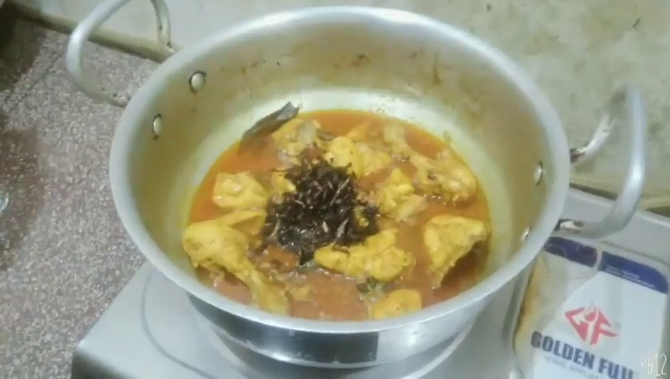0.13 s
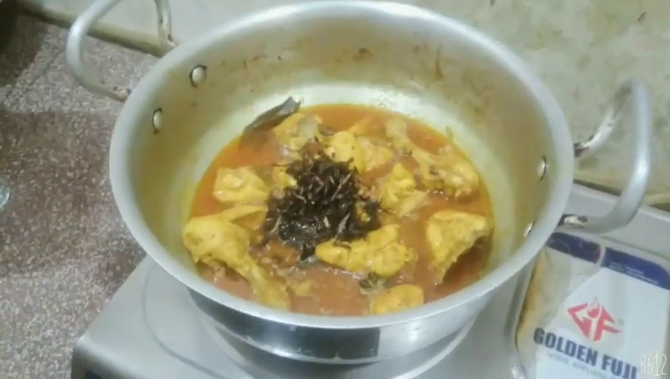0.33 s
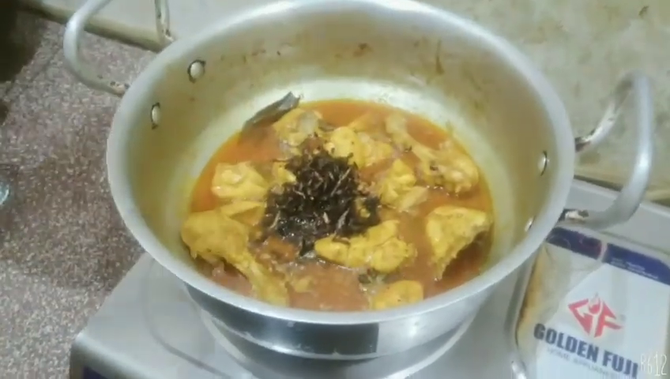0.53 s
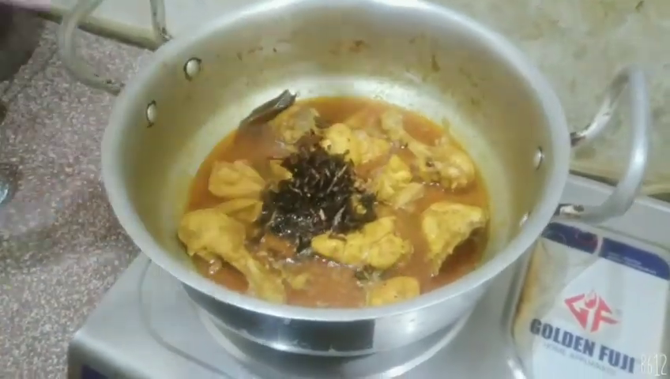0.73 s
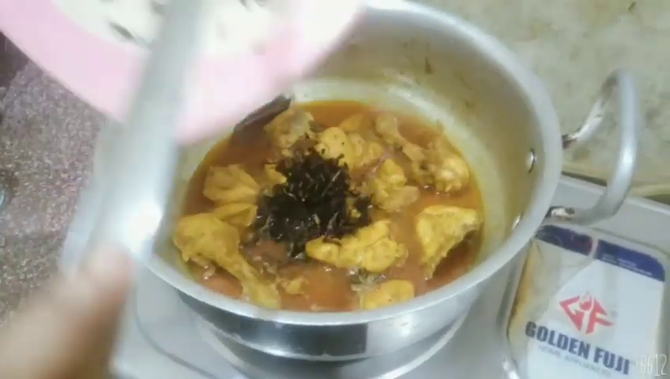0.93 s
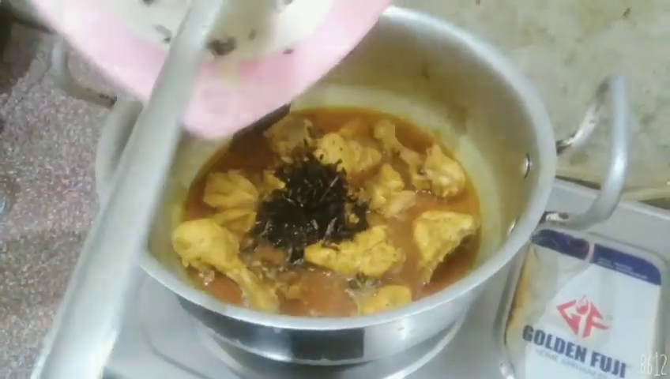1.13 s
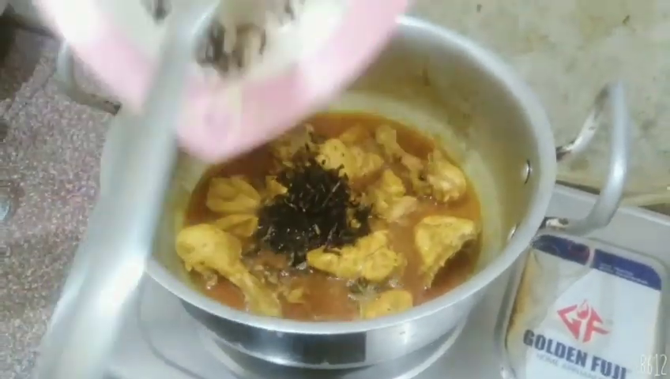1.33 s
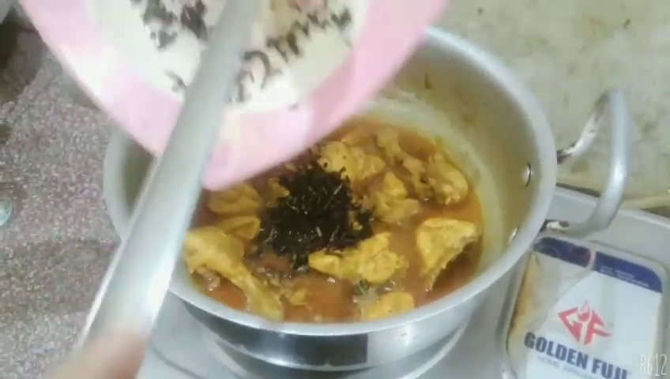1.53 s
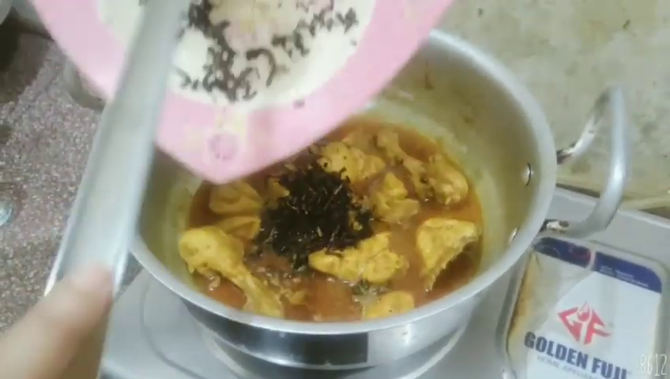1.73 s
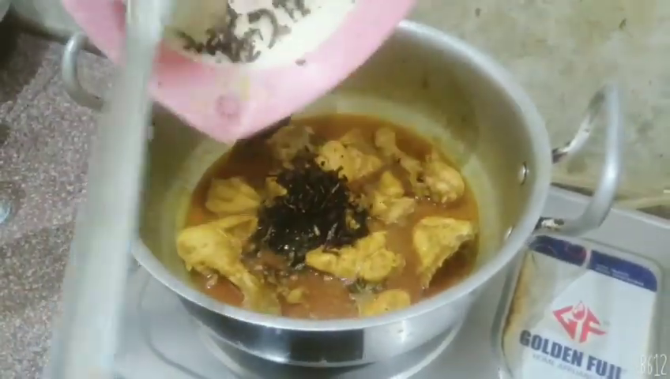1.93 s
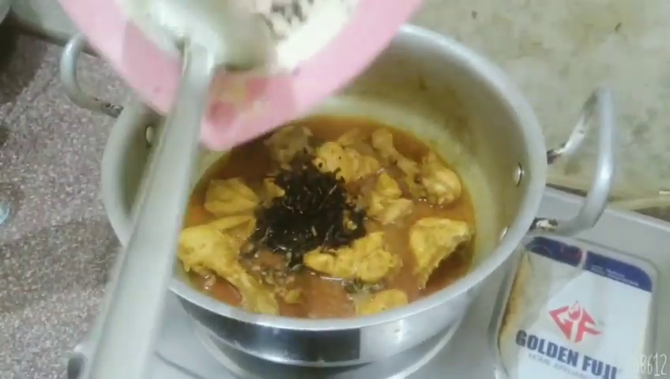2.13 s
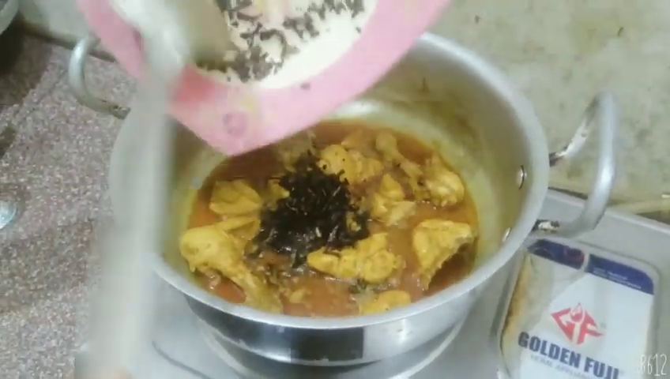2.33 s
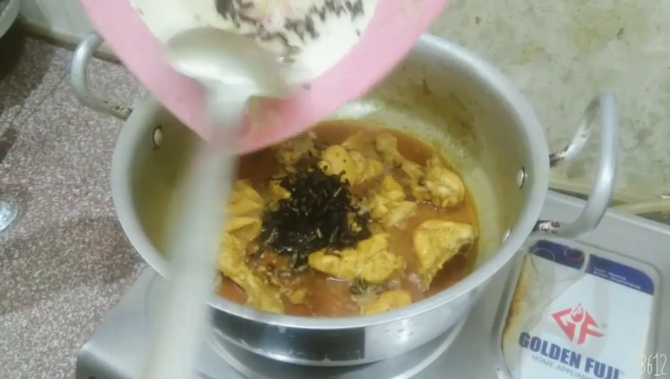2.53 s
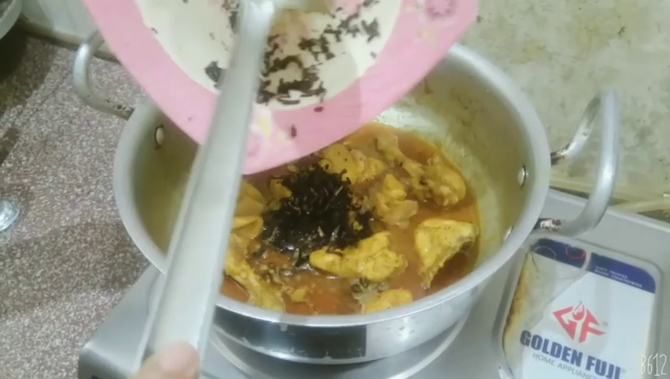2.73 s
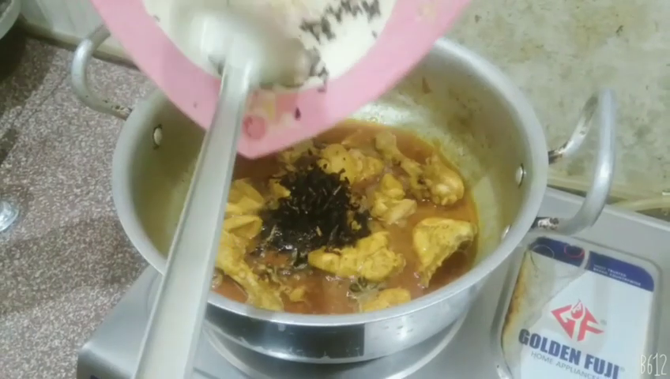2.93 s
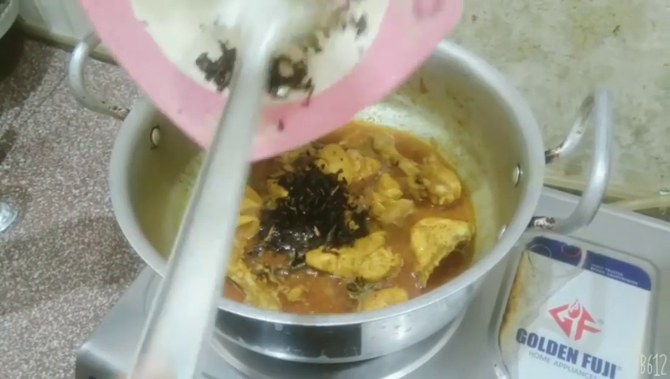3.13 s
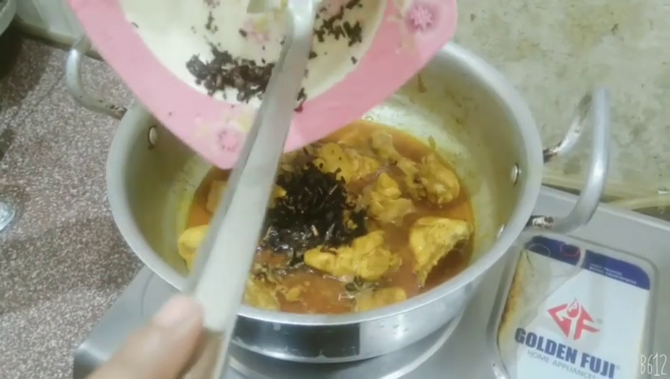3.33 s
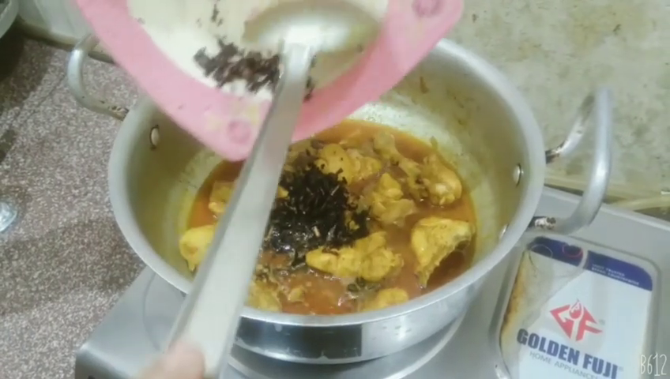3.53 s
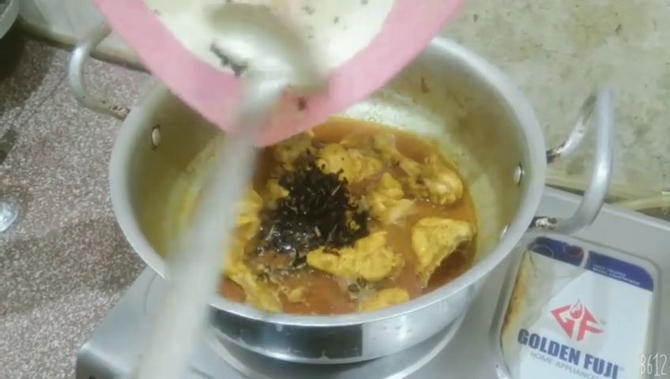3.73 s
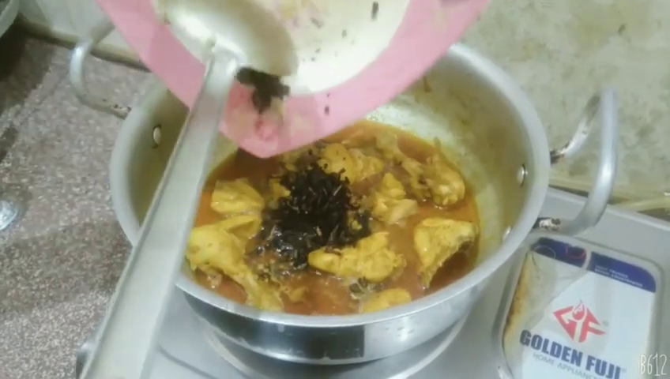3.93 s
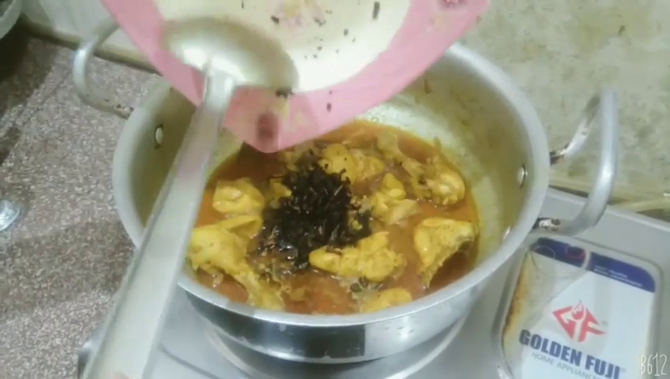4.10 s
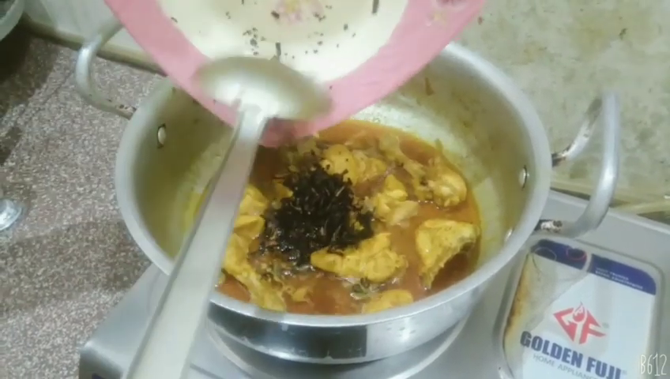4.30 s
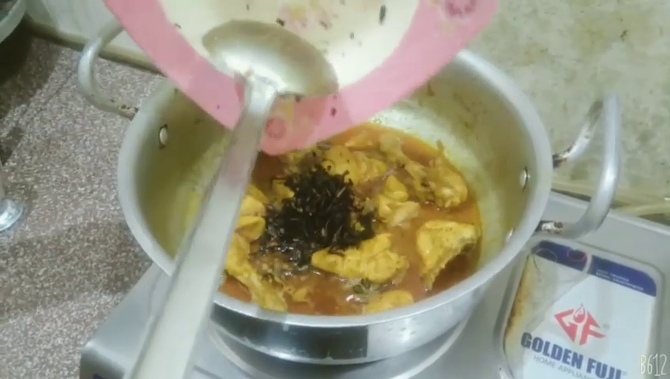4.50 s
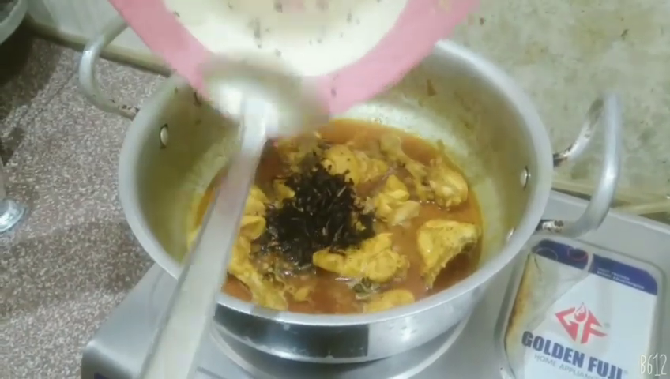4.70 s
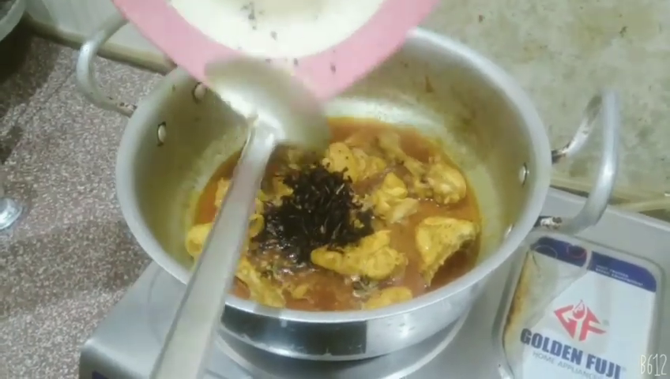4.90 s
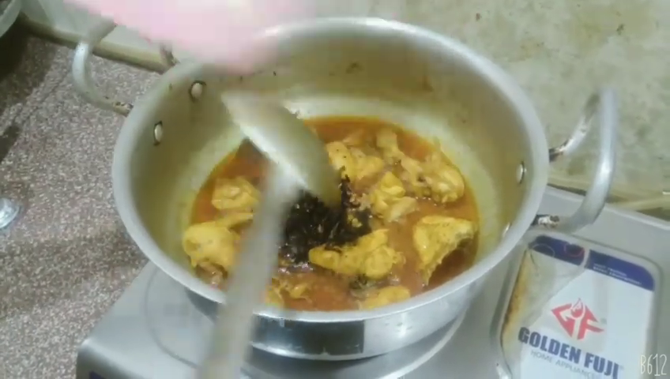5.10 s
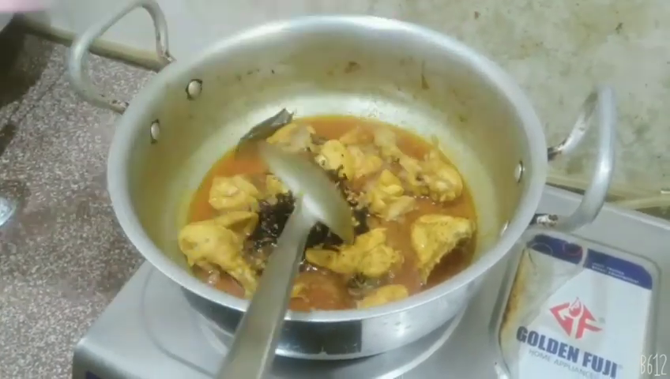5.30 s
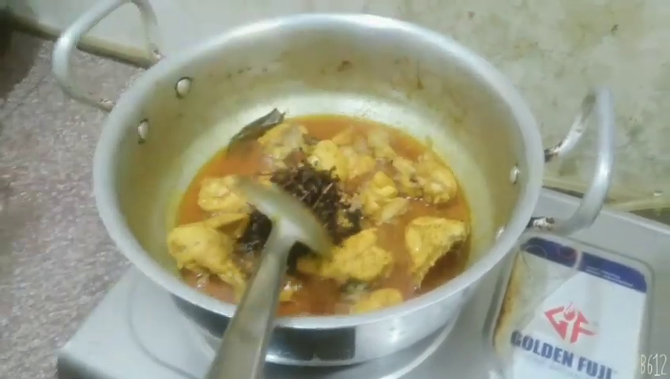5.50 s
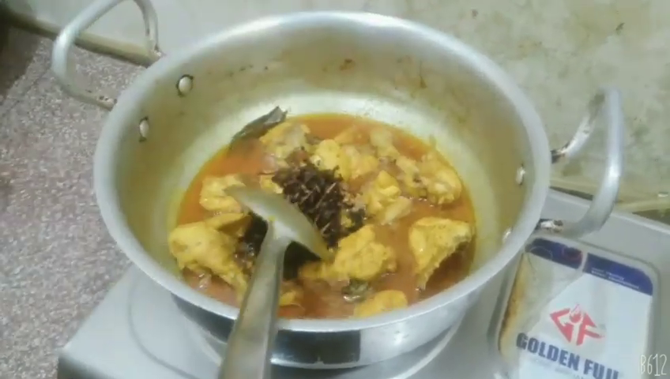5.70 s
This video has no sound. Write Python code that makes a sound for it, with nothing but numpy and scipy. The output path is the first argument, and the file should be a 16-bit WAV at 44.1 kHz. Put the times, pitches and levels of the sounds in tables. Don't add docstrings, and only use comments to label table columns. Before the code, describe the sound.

Irregular hard knocks of a metal spoon on a hand-held plastic plate, with short gritty scrapes of crisp crumbs, in a live tiled kitchen over faint hum.

```python
import sys
import numpy as np
from scipy import signal
from scipy.fft import rfft, irfft
from scipy.io import wavfile
from scipy.ndimage import uniform_filter1d

SR = 44100
rng = np.random.default_rng(int(sys.argv[2]) if len(sys.argv) > 2 else 0)


def transcribe(u):
    v = np.clip(np.atleast_2d(u).T, -1, 1)
    q = np.round(v * 32767).astype(np.int16)
    wavfile.write(sys.argv[1], SR, q)


def volts_from_decibels(level):
    exponent = np.asarray(level, float) / 20
    return 10 ** exponent


N = 253716

# (frequency [Hz], width [Hz], level [dB])
FLAT = [(252, 20, -43), (632, 56, 7.5), (731, 19, -5), (854, 40, 1), (947, 52, 4), (1112, 30, -5.5),
        (1833, 37, -4), (2930, 94, -9), (5520, 150, -2), (6930, 75, -12)]
EDGE = [(274, 180, 1.5), (676, 20, -6), (780, 37, -11), (823, 68, -0.5), (1187, 63, -14), (1410, 53, -4),
        (1610, 57, -1), (2000, 49, -7.5), (2350, 260, 2), (3390, 79, -7.5), (7100, 240, -11.5)]
REBOUND = [(577, 31, -3), (871, 25, -5), (1043, 26, -4), (1254, 47, -4), (1400, 25, -4.5), (1627, 54, 1.5),
           (1705, 40, -14), (1920, 52, -4.5), (2030, 47, -9.5), (2400, 71, -9.5)]
TIPPED = [(320, 34, -15.5), (463, 69, 1), (633, 23.7, 3), (925, 16, -8.5), (1050, 12.7, -6.5),
          (1383, 23, -5), (1400, 23, -32), (1880, 20, -16.5), (2250, 41, -23), (3480, 100, -9.5)]
TICK = [(1410, 280, -7), (2930, 320, 3), (7000, 260, 3), (7740, 200, 2), (12600, 450, 6), (13800, 400, 13)]
SOFT = [(270, 27, -14), (680, 34, 4), (709, 34, -0.5), (994, 23, -9.5), (1330, 15, -31), (1337, 22, -2.5),
        (1470, 30, -13), (1523, 34, -11.5), (2067, 13, -25), (2370, 21, -25), (2770, 47, -14.5),
        (3820, 69, -13.5), (6420, 91, -16)]
LIGHT = [(400, 43, -2.5), (583, 23, -2.5), (1470, 29, -11), (1667, 38, -1), (2020, 58, -8.5),
         (3000, 82, -13), (5580, 53, -26)]
# (time [s], level [dB], contact [s], retune [ratio], tilt [dB per octave])
GRIP_BLOWS = [
    (TICK, 0.8, [(0.139, -37, 0.003, 0.99, 1)]),
    (FLAT, 1.82, [(1.9112, -13, 0.00072, 1.048, 1.36)]),
    (SOFT, 2.42, [(1.4635, -23, 0.0042, 0.97, 0), (3.1127, -10.5, 0.0045, 1.005, 3), (3.147, -34, .003, 1.005, 5)]),
    (EDGE, 2.1, [(2.6035, -11.5, 0.00083, 0.94, 0.5), (3.5787, -11, 0.00066, 0.95, 3.5), (3.6015, -40, 0.00093, 0.6, 10)]),
    (REBOUND, 1.93, [(2.6492, -19, 0.00073, 1.001, 3), (2.7815, -19, 0.0024, 0.95, -23), (2.808, -31, 0.0052, 0.84, -15), (3.6366, -13.5, 0.00059, 1.01, -0.8)]),
    (TIPPED, 1.47, [(4.3045, -27, 0.0031, 0.95, -7)]),
    (TIPPED, 1.74, [(4.819, -24.5, 0.00034, 0.98, 1)]),
    (LIGHT, 1.58, [(4.401, -31.5, 0.0039, 0.93, -0.5), (4.5135, -36, 0.0035, 1.02, 4), (4.9285, -30.5, 0.0012, 1.09, 3), (5.322, -38, 0.00075, 1.02, 2.5)]),
]
# (time [s], plate thud [dB], clack over thud [dB], tick over thud [dB])
KNOCK_TIMES = [(0.0264, -54, 15, -6), (0.0406, -55, 25.5, -1.5), (.128, -57, 18, -16),
               (0.139, -48, -16, -1), (1.4406, -68, -5, 2), (1.464, -20.5, -12, -25.5),
               (1.911, -11, -5, -24.5), (2.0449, -37, 15, -15), (2.194, -60, 14, -10), (2.215, -59, 8, 3),
               (2.267, -60, 14, -4), (2.603, -19, -0.5, -16.5), (2.6493, -23, 3.5, -19),
               (2.782, -26, -31, -41), (3.114, -34.5, -4, -9.5), (3.2427, -42, 12, -7),
               (3.5784, -29.5, 6.5, -4), (3.6365, -31.5, 19, -13.5), (3.791, -41, 12, -18),
               (3.804, -44, 10.5, -22), (4.305, -24, -7, -41), (4.3355, -56, 12, -15), (4.402, -52, 13, -5),
               (4.489, -46, 2, -25), (4.514, -42, -5, -38), (4.819, -27.5, 3.5, -29.5),
               (4.929, -39, -22, -25), (5.324, -41.5, -27, -19.5), (5.413, -62, -28, -5.5),
               (5.593, -57, -6, -14)]
KNOCK_ZONES = [600, 1020, 1550, 3000, 7000]
# (frequency [Hz], level [dB], ring [s])
PLATE_MODES = [(270, -40, 0.02), (333, -30, 0.088), (594, -2.5, 0.035), (700, -36, 0.0047),
               (1000, -15, 0.042), (1094, 3, 0.099), (1370, 8, 0.14), (1490, 13, 0.016), (1535, -23, 0.14),
               (1930, 4, 0.034), (2240, 7.5, 0.018), (2987, -7, 0.029), (3480, 0.5, 0.0058),
               (4170, 2, 0.016), (4466, 5, 0.032), (5420, 10.5, 0.014), (6040, 12, 0.018),
               (6960, 17, 0.024), (7740, 22.5, 0.0079), (8910, 15, 0.01)]
# (frequency [Hz], level [dB], ring [s])
SPOON_MODES = [(317, -35, 0.37), (385, -21, 0.4), (574, -41, 0.045), (960, -14, 0.1), (1660, -27, 0.19),
               (2218, -13, 0.062), (3040, -6, 0.077), (5570, -22, 0.12)]
# (hardest time [s], rise [s], fall [s], level [dB], brightness [dB per layer])
SPOON_STROKES = [(0.043, 0.014, 0.2, -46, -5), (.029, 0.06, 0.063, -50.5, 0.5),
                 (0.138, 0.0064, 0.06, -51.5, 2), (1.479, 0.01, 0.14, -43, 4),
                 (1.541, 0.078, 0.13, -44.5, 2), (2.0, 0.016, 0.18, -42.5, -9.5),
                 (2.2, 0.13, 0.11, -54.5, 7), (2.285, 0.089, 0.045, -48.5, 6.5),
                 (2.669, 0.031, 0.16, -35, -2), (2.793, 0.035, 0.22, -56.5, -10.5),
                 (3.035, .006, 0.063, -75, 7), (3.15, 0.01, 0.067, -43, -16),
                 (3.269, 0.093, 0.11, -43.5, 5.5), (3.661, 0.014, 0.072, -46, -15),
                 (3.8, 0.052, 0.19, -46.5, 0.5), (3.92, 0.25, 0.5, -61.5, 7.5),
                 (4.082, 0.35, 0.064, -55, 5.5), (4.409, 0.047, 0.13, -49.5, -4),
                 (4.519, 0.033, 0.084, -50, 4.5), (4.86, 0.023, 0.034, -53.5, -15),
                 (4.932, 0.0048, 0.07, -38.5, -2), (4.99, 0.1, 0.15, -53.5, 0.5),
                 (5.33, 0.0038, 0.0087, -58, -11), (5.62, .05, 0.065, -79, 4)]
DRAG_LAYERS = [
    -3,
    -8,
    -4.2,
    -1.5,
    -11,
]
LAYER_FALL = [.8, 1.01, 1.2, 1.3, 1.4]
PATH_TIMES = [0, 1.44, 1.92, 2.1, 2.6, 3.1, 3.225, 3.57, 3.775, 4.28, 4.8, 5.3, 5.74]
# (frequency [Hz], width [Hz], level [dB])
PATH_MODES = [
    [(1210, 370, 2.5), (510, 120, -6), (2870, 1100, -0.5), (4250, 170, -8), (7400, 940, -12)],
    [(360, 45, -3.5), (706, 91, -1), (1450, 110, -4), (2150, 130, -7), (4210, 79, -11), (4770, 130, -16),
     (7250, 68, -13)],
    [(600, 41, -5), (1890, 49, -11), (3060, 37, -16), (4250, 60, -12), (5510, 36, -24)],
    [(660, 63, 0.5), (2060, 16, -15), (2374, 36, -0.5), (3210, 57, -0.5), (4300, 56, -15), (5800, 72, -6),
     (7600, 180, -15)],
    [(590, 110, -1), (890, 120, -11), (1490, 230, -4.5), (2160, 220, -13), (3300, 300, -16), (4800, 90, -9)],
    [(775, 250, -4), (1325, 28, 3), (3020, 27, -26), (6790, 65, -26)],
    [(617, 120, 0), (1400, 110, -1.5), (2140, 45, -3), (3070, 52, -1), (4430, 140, -5.5), (5750, 25, 1),
     (6900, 24, 2)],
    [(595, 21, -10), (1057, 32, -2), (1280, 190, -7), (3350, 42, -19), (4700, 110, -5)],
    [(577, 100, 0), (1530, 120, -1), (1000, 290, -5.5), (2910, 120, -7), (4250, 99, -6), (7000, 130, -3.5)],
    [(530, 60, 3), (960, 89, -7), (1380, 90, -5), (1700, 96, -7), (3010, 60, -12), (5740, 300, -13)],
    [(564, 88, -2.5), (950, 240, -8.5), (1354, 29, 4.5), (2650, 34, -17), (4540, 54, -4), (6000, 42, -10)],
    [(575, 38, 11), (1622, 80, -13)],
]
# (frequency [Hz], density [dB per Hz])
CRUMB_SPECTRUM = [(150, -36), (280, -31), (450, 4), (600, -1), (1150, -15), (1500, -1.5), (3400, -7.5),
                  (7000, -3.5), (9500, -15), (12000, -15.5), (15500, -10.5)]
# (frequency [Hz], level [dB], ring [s])
POT_MODES = [(284.5, -54.5, 1), (344.5, -49.5, 0.29), (382, -68, 0.34), (545.3, -66, 0.36),
             (595, -52.5, 0.38)]
# (frequency [Hz], decay by 60 dB [s])
ROOM_DECAY = [(120, 0.92), (500, 0.41), (1500, 0.39), (4000, 0.43), (8000, 0.34), (14000, 0.59)]
# (delay [s], level [dB])
WALL_SLAPS = [(0.01, -17), (.024, -28.5), (.036, -23.5)]
# (frequency [Hz], width [Hz], level [dB])
MOTOR_HUM = [(105, 16.2, -60.5), (151, 18, -72.5), (319.7, 31, -71.5), (390, 35, -77)]
# (time [s], level [dB])
MOTOR_SWELL = [(0, 13), (.14, 11.5), (.3, 9), (.4, 7), (2, 1.5), (4, 4.5), (5.75, 0)]
# (frequency [Hz], density [dB per Hz])
AIR_SPECTRUM = [(15, -61), (25, -50), (46, -13), (70, -18), (105, 2), (161, -17.5), (195, -10.5),
                (212, -13), (317, -10.5), (545, -16.5), (796, -19.5), (1230, -23.5), (1370, -25),
                (7310, -42), (16000, -40.5)]


def level(x, db):
    return x * volts_from_decibels(db) / np.sqrt(np.mean(x ** 2))


def colour(x, table):
    hz, db = np.transpose(table)
    f = np.maximum(np.arange(len(x) // 2 + 1) * SR / len(x), 1)
    gain = volts_from_decibels(np.interp(np.log(f), np.log(hz), db))
    return irfft(rfft(x) * gain, len(x))


def mode(x, hz, t60):
    r = np.exp(-np.log(1000) / (t60 * SR))
    w = 2 * np.pi * hz / SR
    return signal.lfilter([0, r * np.sin(w)], [1, -2 * r * np.cos(w), r * r], x)


def band(x, lo_hz, hi_hz):
    return signal.sosfilt(signal.butter(2, [lo_hz, hi_hz], "band", fs=SR, output="sos"), x)


def noise(size=N):
    return rng.standard_normal(size)


def fading(x, decay_s):
    return signal.lfilter([1], [1, -np.exp(-1 / (decay_s * SR))], x)


def walk(rate, size=N):
    k = int(SR / rate)
    held = np.repeat(noise(size // k + 1), k)
    return 1.3 * uniform_filter1d(uniform_filter1d(held, k), k)[:size]


def hard_knocks():
    out = np.zeros(N)
    t = np.arange(SR // 4) / SR
    for modes, palm_loss, blows in GRIP_BLOWS:
        for s, db, contact_s, tune, tilt_db in blows:
            ring = 0
            for hz, width, mode_db in modes:
                start_db = db - 1.5 + mode_db + tilt_db * np.log2(hz / 600)
                decay_db = 8.7 * np.pi * palm_loss * width * t
                ring = ring + volts_from_decibels(start_db - decay_db) * np.sin(2 * np.pi * tune * hz * t)
            out[int(s * SR):][:len(t)] += ring * (1 - np.exp(-2 * t / contact_s))
    return out


def knocks(spot_db=2.5, ring_db=-8.5, crack_db=-10, crack_s=0.0048, rattle_s=0.0093):
    s, thud, clack, tick = np.array(KNOCK_TIMES).T
    at = ((s + 0.00046) * SR).astype(int)
    middle = ring_db + clack / 2
    zone_db = thud[:, None] + np.c_[0 * clack, middle, middle, clack, tick]
    blow_times = [blow[0] for *_, blows in GRIP_BLOWS for blow in blows]
    hard = np.min(np.abs(s[:, None] - blow_times), axis=1) < 0.005
    modes = PLATE_MODES + SPOON_MODES
    chance = noise((len(s), len(modes)))
    out = np.zeros(N)
    for k, (hz, db, t60) in enumerate(modes):
        push_db = np.array([np.interp(np.log(hz), np.log(KNOCK_ZONES), z) for z in zone_db])
        push = np.zeros(N)
        push[at] = volts_from_decibels(push_db + spot_db * chance[:, k] + db - 7.5)
        if k < len(PLATE_MODES) and hz < 2500:
            push[at[hard]] = 0
        out += (-1) ** k * mode(push, hz, t60)
    strike = np.zeros(N)
    strike[at] = volts_from_decibels(zone_db[:, 4] + 23.5 + crack_db)
    flash = fading(strike, crack_s) + 0.12 * fading(strike, rattle_s)
    return out + flash * band(noise(), 1500, 11000)


def snap(db=-3, length_s=0.0059):
    s, thud, _, tick = np.array(KNOCK_TIMES).T
    strike = np.zeros(N)
    strike[((s + 0.0005) * SR).astype(int)] = volts_from_decibels(thud + tick + db)
    return fading(strike, length_s) * band(noise(), 7000, 14000)


def pressure(t, layer, swing_db=20):
    s, rise, fall, db, bright = np.transpose(SPOON_STROKES)[:, :, None]
    away = np.maximum((s - t) / rise, LAYER_FALL[layer] * (t - s) / fall)
    stroke_db = db + DRAG_LAYERS[layer] + bright * (layer - 1) - swing_db * np.minimum(away, 6)
    return np.sqrt(np.sum(volts_from_decibels(stroke_db) ** 2, axis=0))


def drifting(x, hz, width, drift=0.01):
    centre_hz = hz * (1 + drift * walk(12, size=len(x)))
    turn = np.exp(2j * np.pi * np.cumsum(centre_hz) / SR)
    slow = signal.lfilter([1], [1, -np.exp(-np.pi * max(width, 45) / SR)], x / turn)
    return np.real(turn * slow)


def drags(scatter_db=0.5, patchy_db=0.17, chatter_db=2.0, flare_db=2.5, ripple_db=3.5, tone_db=-3.5, trim_db=-4):
    size_db = scatter_db * np.minimum(rng.exponential(size=N), 2.5)
    clicks = (rng.random(N) < 0.3) * noise() * volts_from_decibels(size_db)
    clicks = clicks * volts_from_decibels(patchy_db * walk(50) + chatter_db * walk(300))
    grit = level(colour(clicks, CRUMB_SPECTRUM), 0)
    out = np.zeros(N)
    centres_hz = [500, 900, 2200, 5600, 9500, 14000]
    for start, end, modes in zip(PATH_TIMES, PATH_TIMES[1:], PATH_MODES):
        k = np.arange(int(start * SR), int(end * SR) + 400)
        sing = 0
        for hz, width, db in modes:
            shaken = clicks[k] * volts_from_decibels(flare_db * walk(14.8, size=len(k)))
            sing = sing + volts_from_decibels(db) * np.sqrt(width) * level(drifting(shaken, hz, width), 0)
        ripple = np.c_[np.linspace(1000, 16000, num=90), ripple_db * noise(90)]
        rub = level(colour(grit[k], ripple), 0) + level(band(sing, 370, 6800), tone_db)
        fade = np.sqrt(np.clip(np.minimum(k - k[0], k[-1] - k) / 400, 0, 1))
        for layer in range(len(DRAG_LAYERS)):
            share = [(hz, 0 if i == layer + 1 else -18) for i, hz in enumerate(centres_hz)]
            out[k] += fade * pressure(k / SR, layer) * level(colour(rub, share), trim_db)
    return out


def hands_on_plate():
    hands = band(hard_knocks() + knocks() + drags(), 187, 7330)
    return hands - 0.72 * band(hands, 391, 550)


def pot(hands):
    return sum(volts_from_decibels(db) * mode(hands, hz, t60) for hz, db, t60 in POT_MODES)


def kitchen(x, wet_db=-5, rise_s=0.012):
    t = np.arange(SR) / SR
    hz, t60 = np.transpose(ROOM_DECAY)
    tail = np.zeros(SR)
    for f in 90 * 2 ** np.arange(0, 7.4, 0.5):
        decay_s = np.interp(np.log(f), np.log(hz), t60)
        tail += band(noise(SR), f / 1.19, f * 1.19) * volts_from_decibels(-60 * t / decay_s)
    tail *= 1 - np.exp(-(t / rise_s) ** 2)
    tail *= volts_from_decibels(wet_db) / np.sqrt(np.sum(tail ** 2))
    for delay, db in WALL_SLAPS:
        k = int(delay * SR)
        tail[k:k + 128] += volts_from_decibels(db) * noise(128) * np.hanning(128) / 7
    return signal.fftconvolve(x, tail)[:N]


def simmer(pop_db=-71, pops_per_s=9, pop_s=0.01):
    spit = 0
    for hz in 4200 * 1.15 ** np.arange(7):
        pops = (rng.random(N) < pops_per_s / SR) * volts_from_decibels(pop_db + 3 * noise())
        spit = spit + mode(pops, hz, pop_s)
    return level(band(noise(), 4560, 8300), -71) * volts_from_decibels(0.75 * walk(15)) + spit


def thump():
    t = np.arange(N) / SR
    return level(band(noise(), 63, 114), -46.5) * np.exp(-((t - 0.17) / 0.14) ** 2)


def hum():
    swell = volts_from_decibels(np.interp(np.arange(N) / SR, *np.transpose(MOTOR_SWELL)))
    return swell * sum(level(band(noise(), f - w / 2, f + w / 2), db) for f, w, db in MOTOR_HUM)


def air(air_db=-56.5):
    swell = walk(2.6)
    out = np.zeros(N)
    for f in 28 * 2 ** np.arange(0, 9.4, 0.5):
        flicker_db = 0.8 * swell * (f > 1000) + 0.5 * walk(8)
        out += band(noise(), f / 1.19, min(f * 1.19, 17000)) * volts_from_decibels(flicker_db)
    out = colour(out, AIR_SPECTRUM)
    return out * volts_from_decibels(air_db) / np.std(band(out, 93, 16000))


def scene():
    hands = hands_on_plate()
    near = hands + snap() + pot(hands)
    background = simmer() + thump() + hum() + air()
    return (near + kitchen(hands) + background)[None, :]


def top_cut(x):
    return signal.sosfilt(signal.butter(12, 16480, fs=SR, output="sos"), x)


def record(dry):
    top = signal.sosfilt(signal.ellip(8, 0.2, 60, 15600, fs=SR, output="sos"), dry)
    return top_cut(top)


dry = scene()
out = record(dry)
transcribe(out)
```